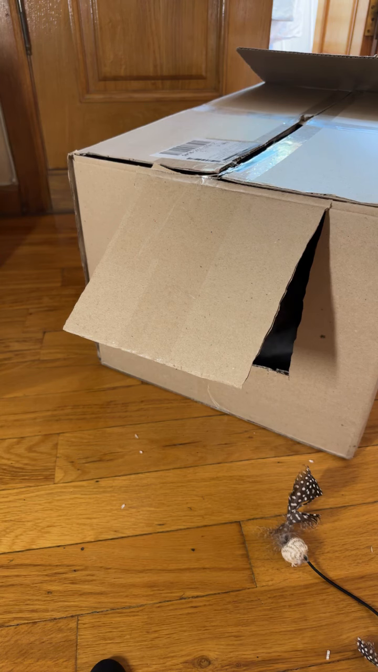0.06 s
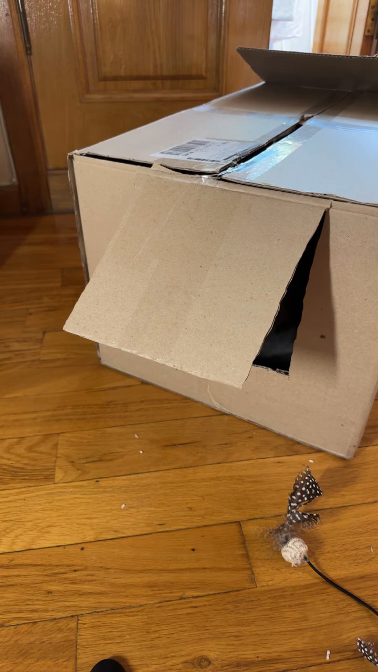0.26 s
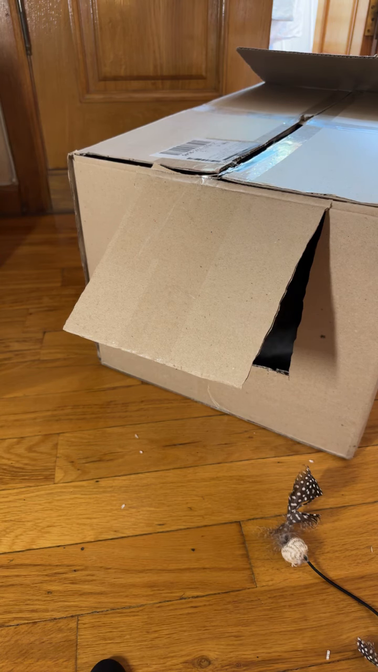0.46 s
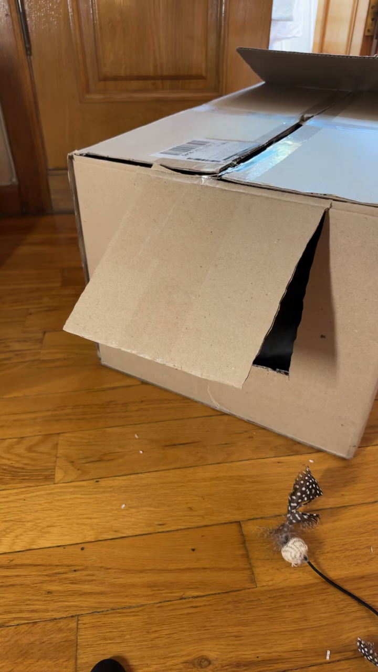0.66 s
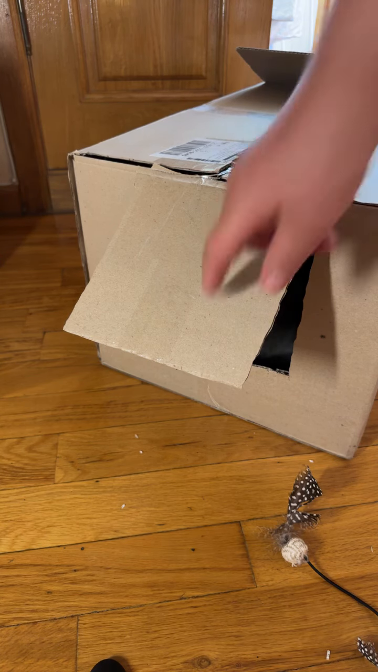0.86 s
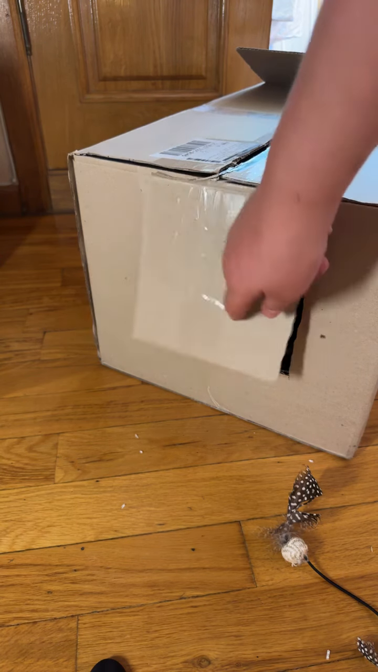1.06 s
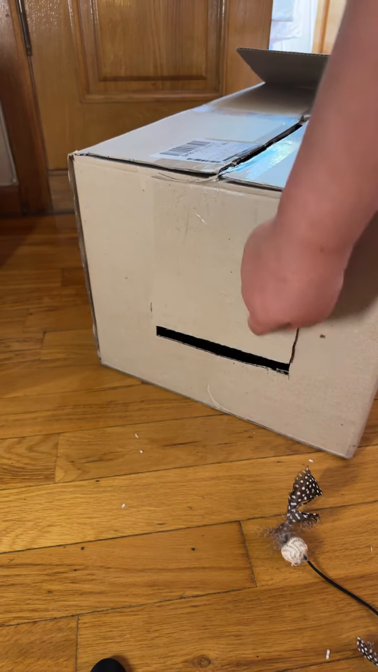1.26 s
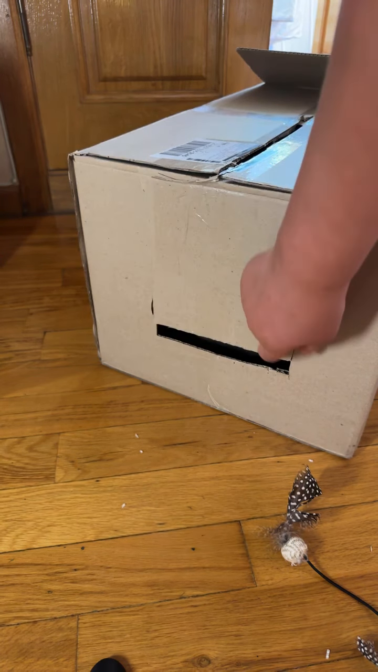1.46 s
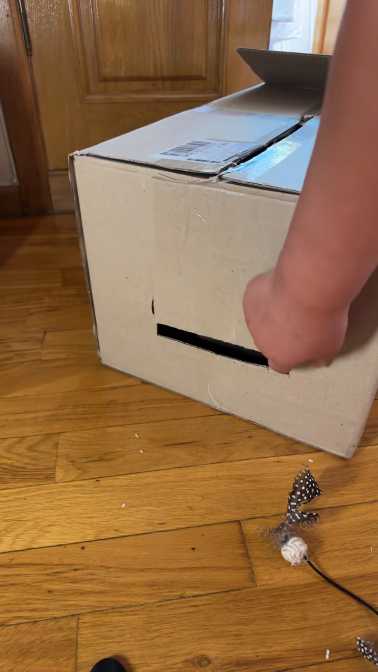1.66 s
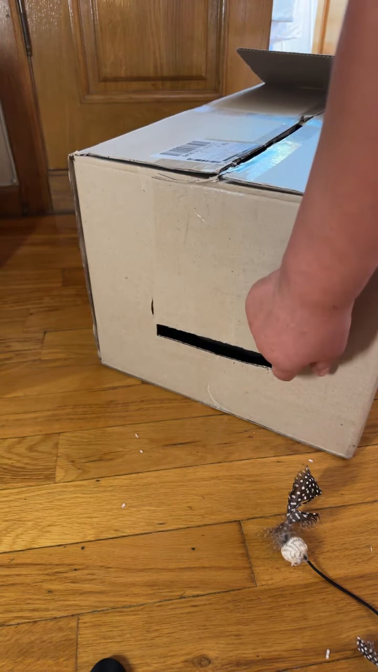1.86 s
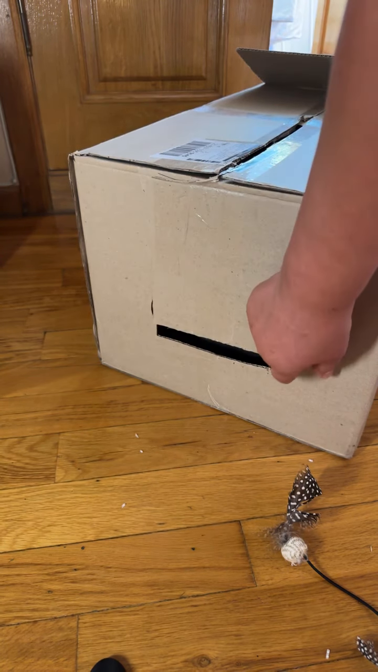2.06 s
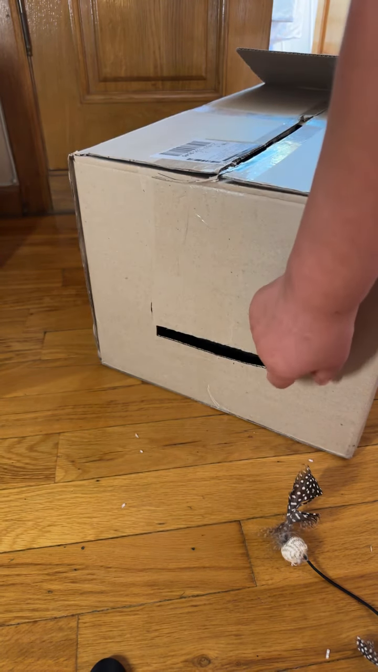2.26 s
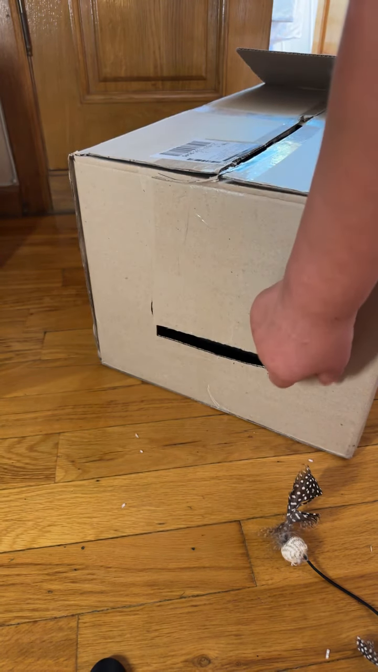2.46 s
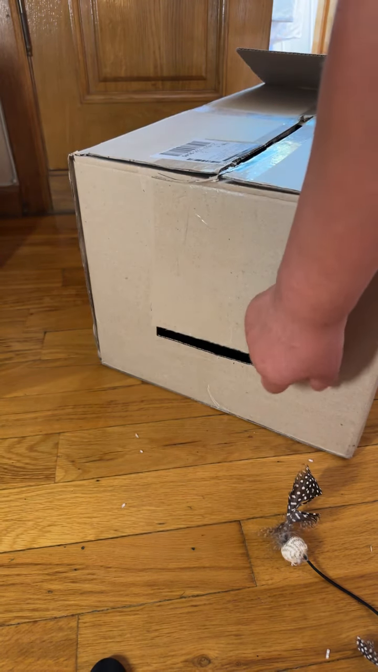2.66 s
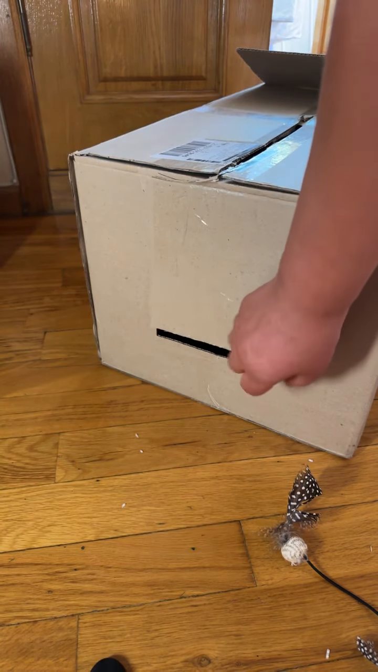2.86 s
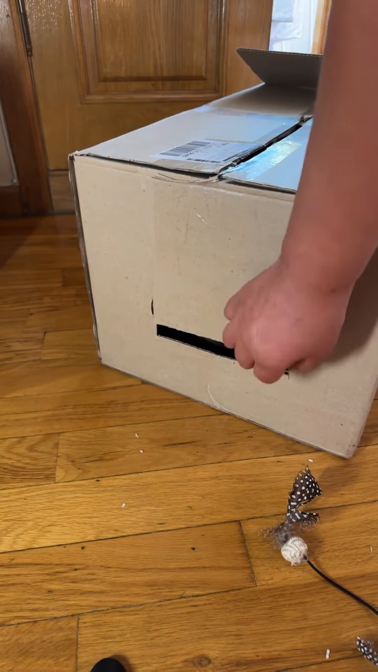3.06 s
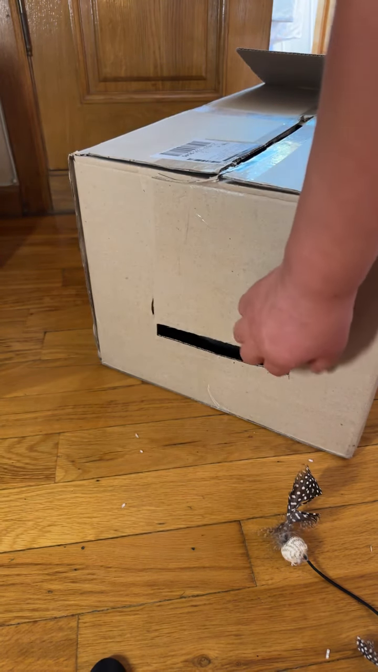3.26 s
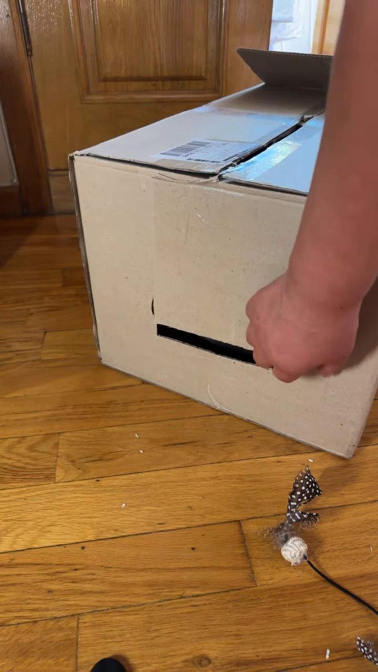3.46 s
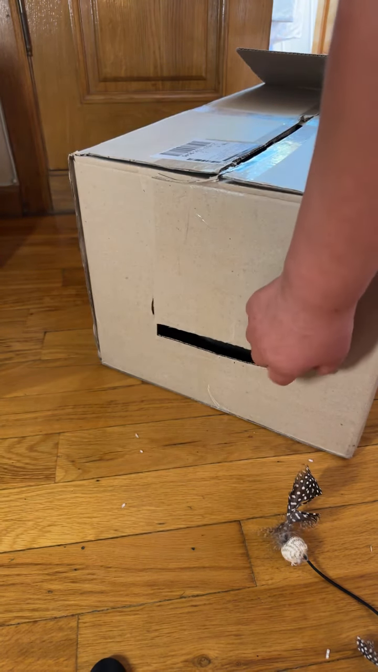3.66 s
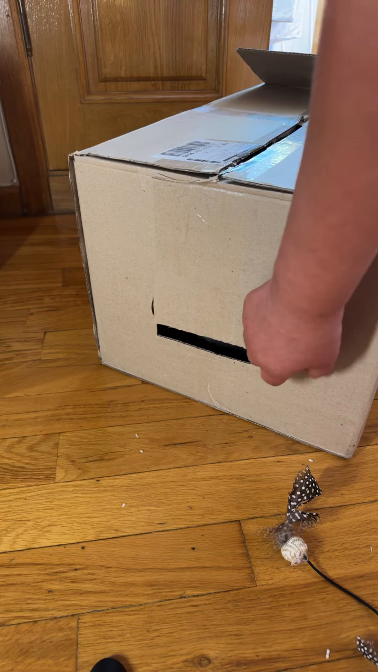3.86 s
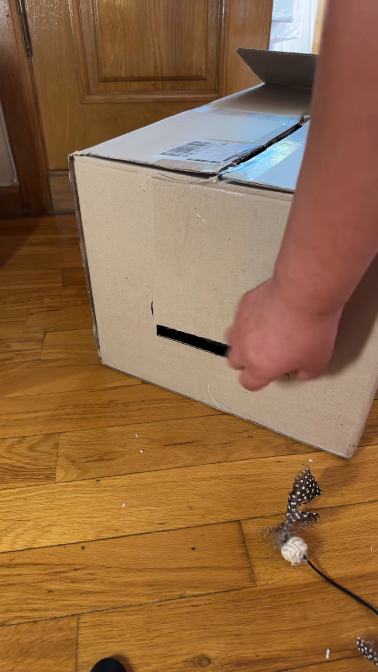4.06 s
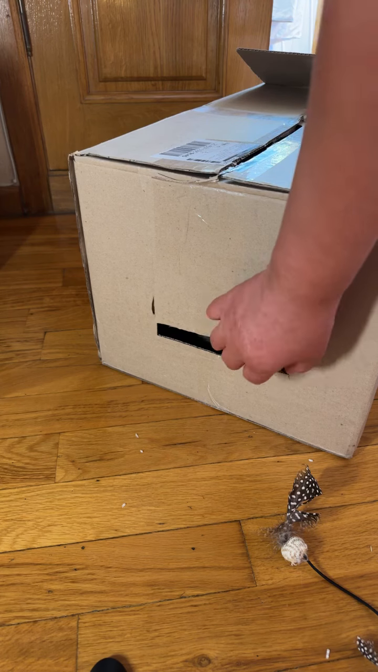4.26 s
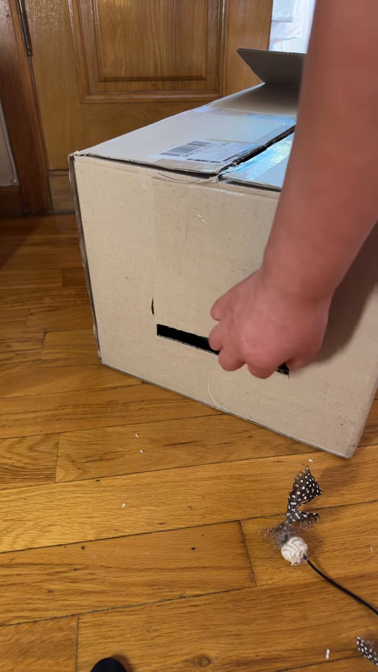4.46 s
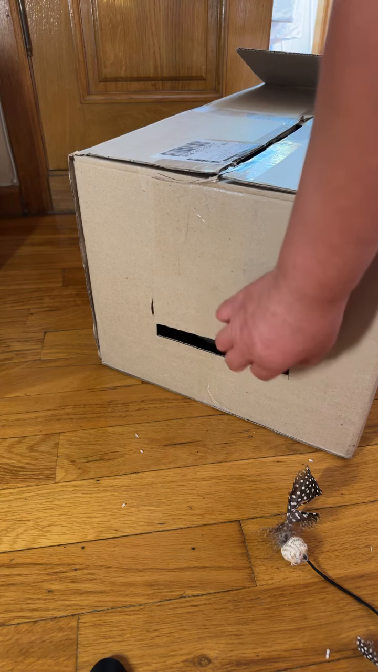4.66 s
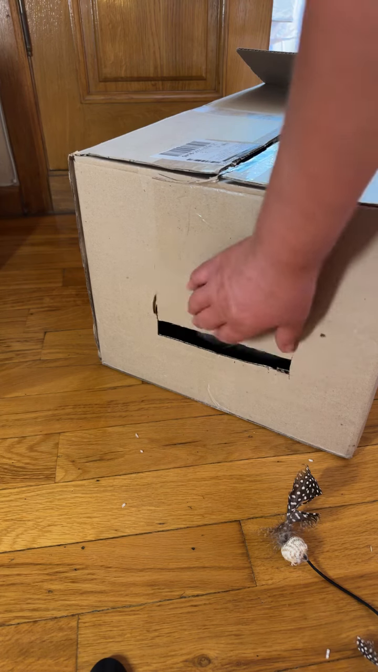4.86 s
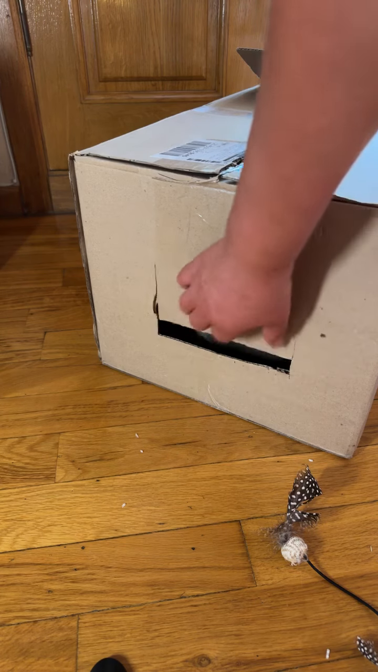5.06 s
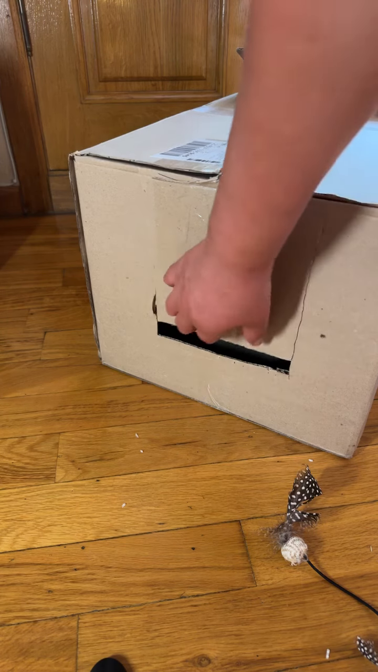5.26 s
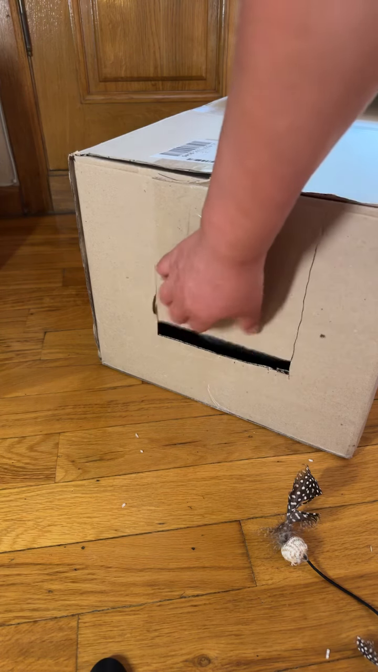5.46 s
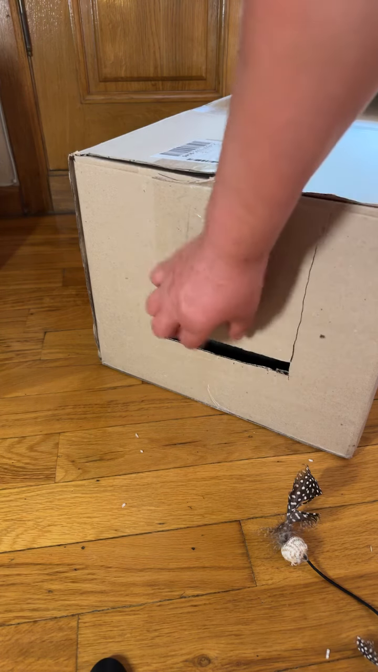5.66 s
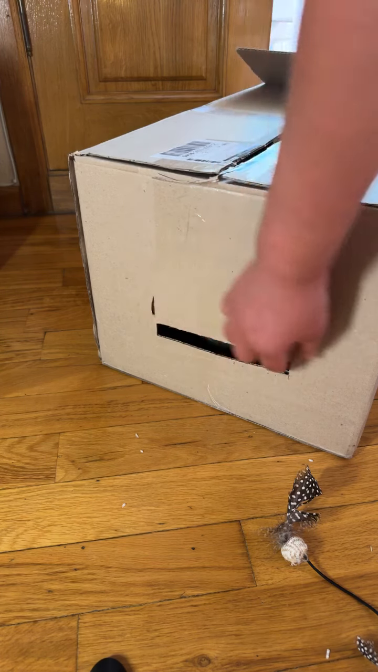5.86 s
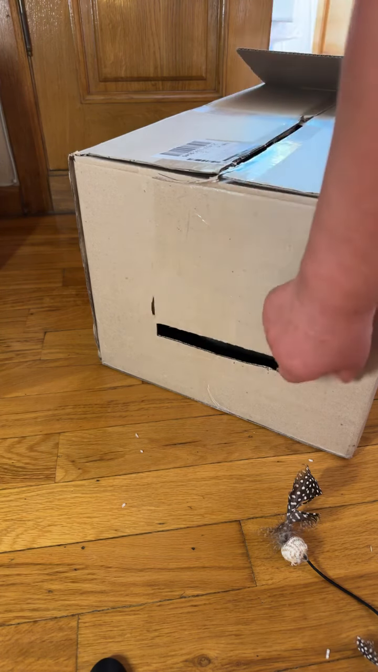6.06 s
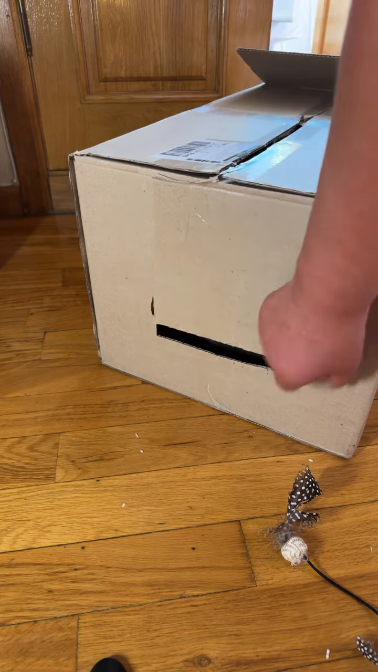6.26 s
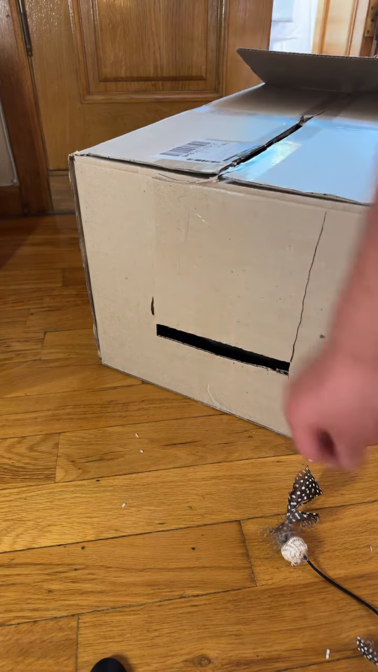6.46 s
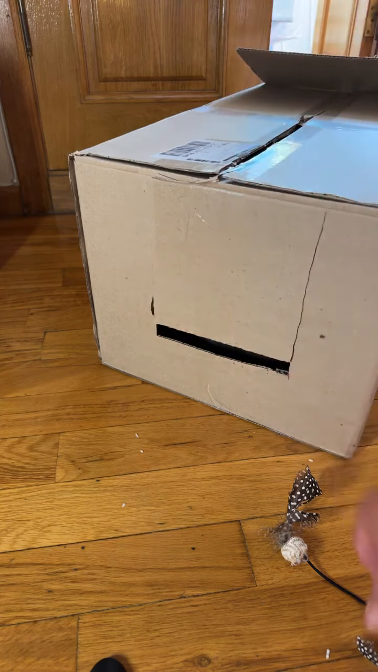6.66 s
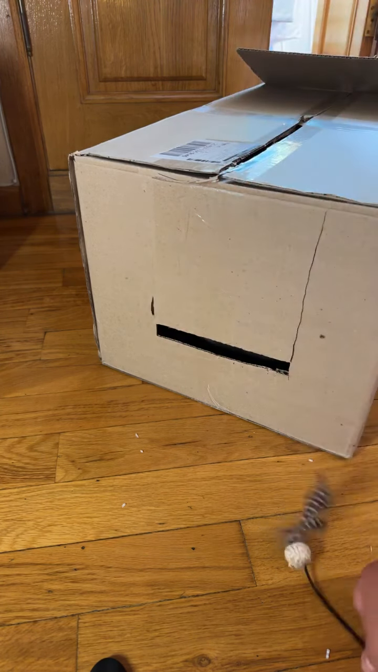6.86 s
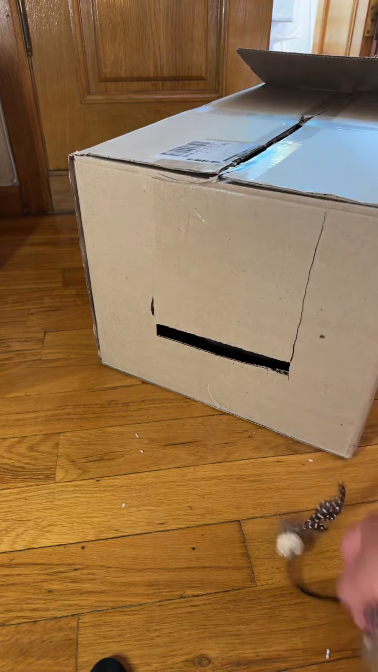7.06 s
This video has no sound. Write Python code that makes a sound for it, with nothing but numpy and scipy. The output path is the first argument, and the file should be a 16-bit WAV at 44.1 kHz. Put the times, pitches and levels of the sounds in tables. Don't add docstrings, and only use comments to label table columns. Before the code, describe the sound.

A close phone microphone picks up an empty cardboard box on a wooden floor in a quiet room. From 0 to 0.8 seconds a faint low engine drone rises slightly and disappears beneath tiny papery ticks. Near 1.0 a soft hollow thump lands, followed by light rustles and sparse tape crackle. Around 1.9-2.2 several crisp taps and scrapes push the flap home; a strong boxy knock comes at 2.75. From 2.9 to 4.3 nails and fingertips rub, catch and tap in uneven dry strokes with small pauses. Between 4.45 and 5.65 the scratching and drumming are loudest and densest, bright cardboard rattles over dull wall thuds. A few separate knocks follow at about 5.85, 6.1 and 6.3. Then it is nearly still, with a faint low appliance hum, a slight tick near 6.9 and a delicate toy-bell tinkle at 7.0.

```python
import sys
import numpy as np
from scipy import signal
from scipy.fft import rfft, irfft, next_fast_len
from scipy.io import wavfile
from scipy.ndimage import uniform_filter1d, map_coordinates

SR = 44100
rng = np.random.default_rng(int(sys.argv[2]) if len(sys.argv) > 2 else 0)


def output_pcm(signal):
    pcm = np.clip(np.atleast_2d(signal).T, -1, 1) * 32767
    wavfile.write(sys.argv[1], SR, np.round(pcm).astype(np.int16))


def convert_level_to_amplitude(level_db):
    exponent = np.asarray(level_db, float) / 20
    return 10 ** exponent


N = 313110
TIME = np.arange(N) / SR
SHUT_S = 2.2

# [f/Hz, width/Hz, level/dB]
BOX = [(118, 63, -4.5), (180.5, 95, -3.5), (282, 143, -3), (360.5, 100, -0.5), (456, 23, -2),
       (554.4, 90, -6), (735, 66, -4.5), (749, 190, -5.5)]
# [f/Hz, width/Hz, level/dB]
BOARD = [(840, 197, -0.5), (980, 101, 6), (1243, 304, 1), (1570, 281, 5), (1753, 340, 0.5), (2128, 140, 2),
         (2400, 132, -3), (2940, 410, -10)]
# [t/s, pressure/dB, nail over pad/dB]
HAND = [(0.0, -58, -3), (0.9, -61, -1), (1.54, -63, 5.5), (1.98, -52, -8), (2.16, -48.5, 0),
        (2.7, -57.5, -0.5), (3.1, -54, 2.5), (3.37, -51, -1.5), (3.87, -59, 0), (4.67, -42, -2),
        (4.88, -49.5, 5.5), (5.12, -45, -12), (5.52, -44, 3.5), (5.75, -57, -17), (5.91, -49, 5.5),
        (6.25, -52, -15), (6.52, -67, -6), (7.1, -74, 3.5)]


def unit(x):
    return x / np.sqrt(np.mean(x ** 2) + 1e-20)


def peak(x):
    return x / np.abs(x).max()


def along(points, hz):
    f, v = np.transpose(points)
    return np.interp(np.log(hz + 1), np.log(f + 1), v)


def curves(rows):
    s, *cols = np.transpose(rows)
    return [np.interp(TIME, s, c) for c in cols]


def wobble(rate):
    knots = rng.standard_normal(int(N * rate / SR) + 4)
    return map_coordinates(knots, [TIME * rate])


def filtered(x, response):
    m = next_fast_len(len(x) + 4096)
    return irfft(rfft(x, m) * response(np.fft.rfftfreq(m, 1 / SR)), m)[:len(x)]


def above(corner_hz):
    return lambda hz: 1 / (1 + (corner_hz / (hz + 1)) ** 6)


def add_at(out, s, sound):
    out[..., round(s * SR):][..., :sound.shape[-1]] += sound


def body(modes, soft_hz):
    def response(f):
        ring = 0
        for k, (centre, width, db) in enumerate(modes):
            loss = 1j * f * width
            ring = ring + (-1) ** k * convert_level_to_amplitude(db) * loss / (centre * centre - f * f + loss)
        return ring / (1 + 1j * f / soft_hz) ** 3
    return response


def paper(hz):
    # [f/Hz, level per Hz/dB]
    skin_colour = [(1530, -5), (2600, -3.5), (3420, -4), (4100, -4), (5600, -6.5), (6090, -3.5),
                   (6620, -5.5), (7370, -5), (8710, -4.5), (9400, -3.5), (10500, -2), (11300, -6),
                   (16000, -6)]
    return convert_level_to_amplitude(along(skin_colour, hz))


def grit(rate, spread_db, smooth):
    chance = rng.random(N)
    size = np.clip(rng.standard_normal(N), -2, 2)
    slips = (chance < rate / SR) * convert_level_to_amplitude(spread_db * size) * rng.choice([-1, 1], N)
    rubbing = unit(slips) + smooth * rng.standard_normal(N)
    clump_db, grain_db = 2 * wobble(60), 1.8 * wobble(170)
    return unit(rubbing * convert_level_to_amplitude(clump_db + grain_db))


def shaken(level, slips, response):
    return filtered(level * slips, response) / np.std(filtered(slips, response))


def glide(rows, unsteady_db):
    hz, db = curves(rows)
    on = np.clip(np.minimum(TIME - rows[0][0] + 0.021, rows[-1][0] - TIME) / 0.023, 0, 1)
    level = np.sqrt(2) * on * convert_level_to_amplitude(db + unsteady_db * wobble(25.0))
    return level * np.sin(2 * np.pi * np.cumsum(hz) / SR)


def lull():
    # [middle t/s, hiss level/dB, half length/s]
    hiss_dips = [(2.45, -6, .06), (2.677, -14, 0.04), (3.46, -6, .04), (4.34, -3, .04), (5.8, -1, .05),
                 (6.58, -8, 0.093)]
    return convert_level_to_amplitude(sum(db * np.exp(-((TIME - s) / half) ** 2) for s, db, half in hiss_dips))


def background():
    # [f/Hz, level per Hz/dB]
    air_colour = [(60, -0.5), (130, -21.5), (300, -27), (600, -34), (1500, -39.5), (2600, -51),
                  (4000, -53.5), (5500, -53), (6800, -53.5), (10500, -59.5), (12000, -80), (14500, -88)]
    # [f/Hz, width/Hz, level/dB]
    cavity = [(58.1, 33, 4), (87, 23, -2)]
    air = filtered(rng.standard_normal(N), lambda hz: convert_level_to_amplitude(along(air_colour, hz)) * (hz > 95))
    air = convert_level_to_amplitude(-56.5 + wobble(3.79)) * unit(air)
    hiss = filtered(air, lambda hz: above(2300)(hz) / (1 + (hz / 6500) ** 6))
    air = air + (lull() - 1) * hiss
    press_db = curves(HAND)[0]
    hand_boom = convert_level_to_amplitude(-52.5 + 0.85 * (press_db - press_db.mean()))
    engine_boom = convert_level_to_amplitude(-49 - 29 * TIME)
    boom = unit(filtered(rng.standard_normal(N), lambda hz: body(cavity, soft_hz=400)(hz) ** 2))
    return air + np.hypot(hand_boom, engine_boom) * boom


def drone():
    # [t/s, f/Hz, level/dB]
    engine = [(0.0, 106.4, -53.5), (0.268, 110.4, -49.5), (0.32, 109.7, -67), (0.362, 110.7, -51),
              (0.512, 112.9, -51), (0.726, 122.5, -57), (0.78, 121, -98)]
    return glide(engine, unsteady_db=2)


def strokes():
    # [t/s, level/dB, rise/s, fall/s]
    pushes = [(2.359, -35, 0.018, 0.023), (2.549, -28.5, 0.016, 0.035), (3.23, -27, 0.023, 0.044),
              (3.55, -26, 0.018, 0.023), (3.792, -30.5, 0.022, 0.022), (3.986, -23.5, 0.044, 0.15),
              (4.016, -18, 0.032, 0.021), (4.509, -27.5, .027, 0.07), (4.58, -31.5, 0.025, 0.076),
              (5.28, -33, 0.027, 0.032), (5.91, -33.5, 0.0086, 0.15), (6.017, -25, 0.0057, 0.011),
              (6.147, -25.5, 0.0092, 0.036), (6.347, -34, .01, 0.046)]
    # [t/s, box wall/dB, board/dB, paper/dB, fall/s]
    skids = [(2.136, -21, -54, -39, 0.015), (3.592, -22.5, -46, -52, 0.039), (4.95, -36, -49, -56.5, .07),
             (5.124, -34, -47, -39, 0.022), (5.533, -19, -22, -29, 0.027), (5.851, -26, -36, -54, 0.04)]
    # [t/s, box wall/dB, board/dB, paper/dB, fall/s]
    scrapes = [(1.5, -52, -59, -59, 0.16), (2.905, -30.5, -41.5, -51.5, 0.097),
               (3.02, -47, -65, -70, 0.015), (3.16, -25, -34.5, -50.5, 0.069),
               (4.1, -33.5, -38, -48.5, 0.11), (4.14, -37, -36, -44.5, 0.06),
               (4.185, -28, -37, -47.5, 0.045), (4.461, -34, -24, -39.5, 0.063),
               (4.648, -30.5, -32, -42, 0.074), (4.76, -37, -59, -60, 0.03),
               (5.585, -39, -39, -41.5, 0.048), (5.647, -46.5, -50, -59.5, 0.14),
               (5.87, -45, -46, -57, 0.087), (3.36, -50, -50.5, -66, 0.036), (6.1, -45, -52, -57, .04)]
    # [t/s, board/dB, paper/dB, fall/s]
    rustles = [(0.141, -56.5, -45, 0.069), (0.329, -54.5, -50, 0.05), (0.629, -59, -53, 0.18),
               (0.72, -51.5, -48, 0.079), (1.059, -53.5, -48, 0.074), (1.264, -53, -54.5, 0.056),
               (1.44, -70, -61, 0.11), (1.775, -69, -57.5, 0.041)]
    rows = [(s, db, db - 28, db - 28.5, -0.5, rise, fall) for s, db, rise, fall in pushes]
    rows += [(*levels, 0, 0.012, fall) for *levels, fall in skids]
    rows += [(*levels, 0, 0.027, fall) for *levels, fall in scrapes]
    rows += [(s, db + 9.5, db, paper_db, -21, 0.028, fall) for s, db, paper_db, fall in rustles]
    power = np.zeros((4, N))
    for s, wall_db, board_db, paper_db, top_db, rise, fall in rows:
        rise, fall = np.clip([rise, fall], .006, .15)
        near = slice(round(s * SR), round((s + .6) * SR))
        t = TIME[near] - s
        swell = np.sin(np.pi / 2 * np.clip(t / rise, 0, 1)) ** 2
        fade = np.exp(-(np.clip(t - rise, 0, None) / fall) ** 1.35)
        level_db = [[wall_db - 13.5], [board_db - 7.5], [paper_db - 5.5], [paper_db + top_db]]
        power[:, near] += (convert_level_to_amplitude(level_db) * swell * fade) ** 2
    return power


def drag():
    press_db, nail_db = curves(HAND)
    mean_db = press_db.mean()
    fidget_db = 2.5 * wobble(7.8)
    skin_db = fidget_db + mean_db + 0.38 * (press_db - mean_db)
    shut_db = -7 * np.clip((TIME - SHUT_S) / 0.16, 0, 1)
    dull_db = skin_db + nail_db - 13 + shut_db
    bright_db = skin_db + 1.5 * nail_db - 21
    wall, board, skin, top = strokes()
    wall_level = np.sqrt(wall + convert_level_to_amplitude(press_db - 3.5) ** 2)
    board_level = np.sqrt(board + convert_level_to_amplitude(press_db - 11.5) ** 2)
    skin_level = np.sqrt(0.47 * skin + (lull() * convert_level_to_amplitude(dull_db)) ** 2)
    slips = grit(rate=700, spread_db=4.0, smooth=0.71)
    fine = grit(rate=1300, spread_db=3.0, smooth=1.2)
    high = above(7000)
    low_paper = lambda hz: paper(hz) * (1 - high(hz))
    high_paper = lambda hz: paper(hz) * high(hz)
    resting_paper = lambda hz: high_paper(hz) / (1 + (hz / 12000) ** 8)
    return (shaken(wall_level, slips, body(BOX, soft_hz=1280))
            + shaken(board_level, slips, body(BOARD, soft_hz=3960))
            + shaken(skin_level, fine, low_paper)
            + shaken(np.sqrt(0.031 * top), fine, high_paper)
            + shaken(convert_level_to_amplitude(bright_db), fine, resting_paper))


def catches():
    # [t/s, peak level/dB, ring f/Hz, paper level/dB]
    ridges = [(0.16, -51, 1770, -54), (0.376, -44, 1190, -56), (0.606, -48, 1130, -61),
              (0.9335, -59, 1430, -69), (0.9825, -46, 1200, -59), (1.5828, -49, 1480, -54),
              (1.6596, -44, 3400, -56), (1.916, -34, 1460, -49), (1.9332, -38, 1490, -60),
              (2.144, -30, 1340, -35), (2.1544, -29, 1480, -45), (2.2362, -34, 1180, -60),
              (2.929, -45, 1240, -58), (2.9567, -37, 1570, -58), (2.9874, -36.5, 1380, -57),
              (3.1792, -35, 1380, -57), (3.3757, -52, 1430, -69), (3.7673, -59, 1270, -65),
              (3.9978, -49, 1260, -55), (4.0218, -42, 1540, -51), (4.0533, -31, 1150, -47),
              (4.1116, -37, 1350, -59), (4.135, -39, 1450, -56), (4.1704, -36, 1220, -56),
              (4.1989, -32, 1310, -53), (4.224, -31.5, 1630, -57), (4.4709, -23, 1390, -46),
              (4.5184, -26, 1280, -53), (4.6628, -38, 1100, -56), (4.6713, -36, 1360, -52),
              (4.914, -20, 1670, -27), (4.9367, -24, 1740, -30), (4.9965, -30, 1990, -39),
              (5.1033, -21, 1660, -39), (5.124, -23, 1510, -38), (5.248, -25, 2160, -43),
              (5.3206, -29, 1660, -38), (5.4171, -38, 1760, -53), (5.445, -28, 1990, -45),
              (5.5405, -20, 1700, -38), (5.6226, -28, 2170, -48), (5.8621, -33, 1310, -59),
              (6.1802, -36, 1420, -43), (6.3535, -46, 1490, -56), (6.8798, -47, 1210, -73)]
    out, t = np.zeros(N + SR), np.arange(SR // 25) / SR
    for s, db, hz, paper_db in ridges:
        burst = rng.standard_normal((2, len(t))) * (1 - np.exp(-t / .0004)) * convert_level_to_amplitude(-60 * t / 0.0094)
        ring = peak(filtered(burst[0], body([(hz, 0.37 * hz, 0)], soft_hz=5000)))
        spark = peak(filtered(burst[1], paper))
        add_at(out, s, convert_level_to_amplitude(db - 5.5) * ring + convert_level_to_amplitude(paper_db + 4) * spark)
    return out[:N]


def taps():
    # [t/s, board peak/dB, knock/dB, nail crack/dB]
    centre = [(0.32, -49, -50, -49.5), (0.375, -55, -70, -55.5), (0.623, -40, -59, -49.5),
              (0.981, -37, -39.5, -55), (1.536, -62, -69, -62), (1.659, -41.5, -58, -47),
              (1.915, -32.5, -43.5, -45), (2.142, -30, -34, -41), (3.614, -35.5, -33.5, -51),
              (3.88, -56, -48.5, -62), (4.464, -29, -40.5, -52), (4.477, -46, -38.5, -42),
              (4.884, -44, -38.5, -59), (5.102, -22.5, -27, -43), (5.262, -24, -31, -45),
              (5.523, -21.5, -28, -41), (5.849, -30, -40, -64), (6.274, -55, -37.5, -69)]
    # [t/s, board peak/dB, knock/dB, nail crack/dB]
    midway = [(0.234, -60, -57, -46), (2.235, -36.5, -32, -61), (2.414, -61, -36.5, -81),
              (2.757, -20, -22.5, -32.5), (2.974, -31.5, -40, -54), (3.028, -52, -45, -62),
              (3.132, -48, -43, -56), (3.153, -46, -34.5, -62), (3.576, -41, -33.5, -49.5),
              (4.037, -36.5, -34, -57), (4.152, -35, -35, -66), (4.373, -38, -39, -48.5),
              (4.497, -22, -39.5, -46), (4.752, -41, -31, -41), (4.917, -16, -29.5, -23),
              (5.006, -52, -30.5, -55), (5.39, -39, -42.5, -67), (5.445, -28, -32.5, -46.5),
              (5.634, -26, -40.5, -47), (6.092, -38, -25, -64), (6.178, -36, -33, -50),
              (6.934, -52, -50, -59)]
    # [t/s, board peak/dB, knock/dB, nail crack/dB]
    edge = [(1.995, -32.5, -57, -55.5), (2.135, -28, -35, -49), (3.178, -28.5, -46, -66),
            (3.224, -32, -41.5, -62), (4.905, -25, -35, -40), (4.995, -21.5, -29, -45),
            (5.125, -25.5, -30, -36), (5.247, -20, -31, -47), (5.32, -23.5, -31, -40.5),
            (5.434, -37, -39, -54), (5.549, -25, -22, -34.5), (6.326, -32, -31, -42.5)]
    # (contacts, knock pitch in Hz, contact length in s)
    spots = [(centre, 170, 0.0241), (midway, 297.7, 0.02274), (edge, 496, 0.02158)]
    hits = [(*row, hz, length) for rows, hz, length in spots for row in rows]
    out, t = np.zeros((3, N + SR)), np.arange(SR // 8) / SR
    for s, board_db, knock_db, crack_db, knock_hz, length in hits:
        noise = rng.standard_normal((3, len(t)))
        close = 2.1 < s < 6.5
        bright_hz, crack_shape = (18000, 1.3) if close else (6500, 2.5)
        skin = lambda hz: paper(hz) / (1 + (hz / bright_hz) ** 3)
        touch = (1 - np.exp(-t / (0.069 * length))) * convert_level_to_amplitude(-60 * t / length)
        push = np.exp(-((t - 0.2462 * length) / 0.00041) ** 2)
        push = push + 3.23 * noise[0] * touch ** 0.8
        knock = peak(filtered(push, body([(knock_hz, 95, 3)] + BOX, soft_hz=1120)))
        rattle = peak(filtered(noise[1] * touch, body(BOARD, soft_hz=4100)))
        crack = peak(filtered(noise[2], skin) * (1 - np.exp(-t / 0.002)) * touch ** crack_shape)
        parts = [convert_level_to_amplitude(knock_db + 7.5) * knock, convert_level_to_amplitude(board_db - 2.5) * rattle, convert_level_to_amplitude(crack_db + 9.5) * crack]
        add_at(out, s, np.array(parts) * np.cos(np.pi * t / t[-1] / 2))
    return out[:, :N]


def room(x):
    # [f/Hz, t60/s]
    room_t60 = [(100, 0.56), (500, 0.27), (2000, 0.31), (8000, 0.15), (16000, 0.14)]
    hz, t, z = signal.stft(rng.standard_normal((2, SR // 2)), SR, nperseg=256)
    decay = convert_level_to_amplitude(-60 * t / along(room_t60, hz)[:, None])
    tails = signal.istft(z * decay, SR, nperseg=256)[1]
    turn = 2 * np.pi * 1.7 * TIME
    late = np.pad(x * [np.cos(turn), np.sin(turn)], ((0, 0), (350, 0)))
    wet = signal.fftconvolve(late, tails, axes=1)
    return wet.sum(0)[:N] / np.linalg.norm(tails[0])


def scatter(x, t60, colour):
    keep = convert_level_to_amplitude(-120 / (t60 * SR))
    energy = signal.lfilter([1 - keep], [1, -keep], np.pad(x ** 2, (300, 0))[:N])
    level = np.sqrt(np.abs(uniform_filter1d(energy, size=200)))
    return level * unit(filtered(rng.standard_normal(N), colour))


def wash(rattle, crack):
    far_paper = lambda hz: paper(hz) / (1 + (hz / 12000) ** 3)
    board_wash = scatter(rattle, t60=0.28, colour=body(BOARD, soft_hz=3460))
    paper_wash = scatter(crack, t60=0.39, colour=far_paper)
    return convert_level_to_amplitude(-4.5) * board_wash + convert_level_to_amplitude(-2.5) * paper_wash


def patches(x, depth_db):
    z = signal.stft(x, nperseg=512)[2]
    field = uniform_filter1d(rng.standard_normal(z.shape), size=2, axis=0)
    field = uniform_filter1d(field, size=30, axis=1)
    hz = np.linspace(0, SR / 2, len(z))[:, None]
    depth_db = depth_db / (1 + (hz / 7000) ** 2) ** .5
    gain_db = depth_db * unit(field) - depth_db ** 2 * np.log(10) / 20
    return signal.istft(z * convert_level_to_amplitude(gain_db), nperseg=512)[1][:N]


def pings():
    # [t/s, peak level/dB, f/Hz, t60/s]
    nail_tips = [(0.31, -36, 1510, 0.073), (1.918, -29, 1400, 0.084), (1.9957, -21, 1680, 0.058),
                 (3.8816, -34, 2300, 0.033), (6.0933, -14.5, 1200, 0.033), (3.8, -31, 2070, .2),
                 (4.998, -18, 2100, 0.11), (5.262, -21, 2300, 0.16), (5.447, -24, 2100, .12),
                 (3.222, -25, 2250, 0.066), (5.045, -26, 1900, .06), (5.088, -22, 1400, .03),
                 (5.5, -28, 2100, .06), (6.0935, -14, 800, .04), (2.2357, -22, 1200, .03),
                 (5.634, -18, 1100, .03), (6.327, -26, 2300, .025), (2.759, -10, 800, .05),
                 (1.7, -35, 1560, .03)]
    out, t = np.zeros(N + SR), np.arange(SR // 4) / SR
    for s, db, hz, t60 in nail_tips:
        wander = np.cumsum(0.018 * rng.standard_normal(len(t)))
        add_at(out, s, convert_level_to_amplitude(db - 17.5 - 60 * t / t60) * np.sin(2 * np.pi * hz * t + wander))
    return out[:N]


def snaps():
    # [t/s, peak level/dB, lowest f/Hz]
    fibres = [(0.829, -58, 11000), (1.537, -42, 6000), (2.27, -61, 8000), (3.545, -50, 6000),
              (3.56, -52, 6000), (3.725, -60, 2000), (4.452, -47, 8000), (4.612, -56, 9000),
              (4.742, -31, 7000), (4.885, -56, 2000), (5.633, -42, 7000), (6.354, -48, 5000),
              (1.555, -56, 3500), (1.61, -57, 3500), (1.635, -58, 3000), (1.69, -58, 3000),
              (5.553, -36, 3000)]
    out, t = np.zeros(N + SR), np.arange(SR // 20) / SR
    for s, db, hz in fibres:
        hiss = filtered(rng.standard_normal(len(t)), above(hz))
        add_at(out, s, convert_level_to_amplitude(db) * peak(hiss * (1 - np.exp(-t / .0007)) * convert_level_to_amplitude(-60 * t / 0.018)))
    return out[:N]


def thuds():
    # [t/s, wall peak/dB, wall f/Hz, air level/dB]
    blows = [(0.988, -24, 161.7, -39.5), (2.16, -31, 104, -48), (2.549, -32.5, 179, -50),
             (2.76, -20.5, 172.5, -30), (3.153, -40, 146, -59), (3.229, -38, 145, -45),
             (3.611, -25, 155, -63), (4.056, -30, 178, -46), (4.389, -35, 147, -41.5),
             (4.466, -25.5, 129, -63), (4.756, -28, 168, -47), (4.92, -22.5, 181, -30.5),
             (5.096, -26, 127, -22.5), (5.119, -37, 120, -33.5), (5.524, -42, 184, -34),
             (5.55, -45, 188, -47), (5.862, -24, 152, -39), (6.091, -32, 194, -60),
             (6.273, -29.5, 138, -37.5), (6.329, -45, 128, -45)]
    out, t = np.zeros(N + SR), np.arange(SR // 2) / SR
    for s, wall_db, hz, air_db in blows:
        t60 = 0.14 * (151 / hz) ** 0.49
        if s < SHUT_S / 2:
            t60 *= 1.63
        wall = convert_level_to_amplitude(wall_db - 60 * t / t60) * (1 - np.exp(-t / 0.006)) * np.sin(2 * np.pi * hz * t)
        air_hz = 71 * convert_level_to_amplitude(rng.normal(0, 0.11))
        air = convert_level_to_amplitude(air_db + 10.0 - 60 * t / 0.21) * (1 - np.exp(-t / 0.0056)) * np.sin(2 * np.pi * air_hz * t)
        add_at(out, s, wall + air)
    return out[:N]


def tape():
    # [f/Hz, width/Hz, level/dB]
    tape_modes = [(4030, 170, -0.5), (5850, 420, -1.5), (7600, 300, -8)]
    # [middle t/s, level/dB, half length/s]
    creaks = [(1.525, -67, 0.19), (1.79, -70.5, 0.11), (2.121, -62, 0.02), (2.357, -73, 0.058),
              (3.61, -57, 0.032)]
    level = sum(convert_level_to_amplitude(db) * np.exp(-((TIME - s) / half) ** 2) for s, db, half in creaks)
    return shaken(level, grit(rate=990, spread_db=2.0, smooth=0.77), body(tape_modes, soft_hz=15000))


def squeak():
    # [t/s, f/Hz, level/dB]
    skin_slip = [(5.755, 11750, -79), (5.782, 12100, -75), (5.797, 12400, -74), (5.815, 12150, -76),
                 (5.85, 11800, -79)]
    return glide(skin_slip, unsteady_db=1.5)


def hum():
    # [t/s, f/Hz, level/dB]
    appliance = [(6.42, 61.5, -54), (6.65, 62, -50.5), (6.85, 63, -51), (7.12, 65, -53.5)]
    return glide(appliance, unsteady_db=2.5)


def bell():
    # [f/Hz, level/dB, t60/s]
    shell = [(4470, -9, 0.15), (5070, -4, .1), (10700, -0.5, 0.049), (12900, -13, .2), (15600, -26, .06)]
    # [t/s, peak level/dB]
    tinkles = [
        (6.9948, -61),
        (7.019, -45),
    ]
    out, t = np.zeros(N + SR), np.arange(SR // 4) / SR
    for s, db in tinkles:
        ring = 0.6 * convert_level_to_amplitude(-60 * t / 0.025) * np.diff(rng.standard_normal(len(t) + 1))
        for hz, level_db, t60 in shell:
            ring += convert_level_to_amplitude(level_db + rng.normal(0, 2.2) - 60 * t / t60) * np.sin(2 * np.pi * hz * t)
        add_at(out, s, convert_level_to_amplitude(db - 11.5) * ring)
    return out[:N]


def scene():
    knock, rattle, crack = taps()
    board = patches(rattle + wash(rattle, crack) + drag(), depth_db=4.0)
    box = board + catches() + pings() + snaps() + tape() + crack + knock + convert_level_to_amplitude(-7.0) * room(knock) + thuds()
    faint = background() + drone() + squeak() + hum() + bell()
    return (box + faint)[None]


def low_pass(x):
    return signal.sosfilt(signal.butter(12, 16640, fs=SR, output="sos"), x)


def record(dry):
    bass_cut = lambda hz: (1j * hz / (50 + 1j * hz)) ** 4
    top_cut = lambda hz: np.clip((16350 - hz) / 500, 0, 1) ** 2
    mix = filtered(dry[0], lambda hz: bass_cut(hz) * top_cut(hz))
    return low_pass(mix[None])


dry = scene()
out = record(dry)
output_pcm(out)
```